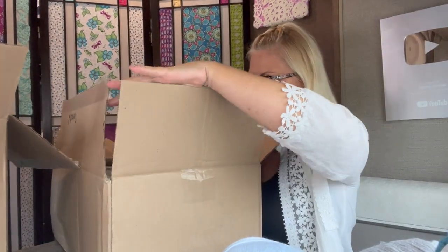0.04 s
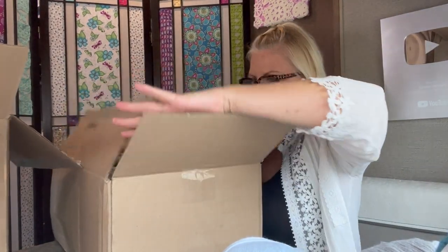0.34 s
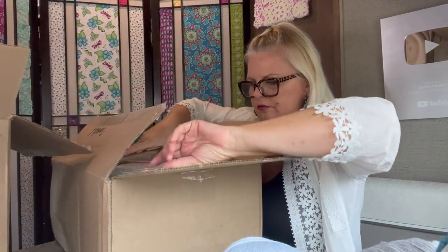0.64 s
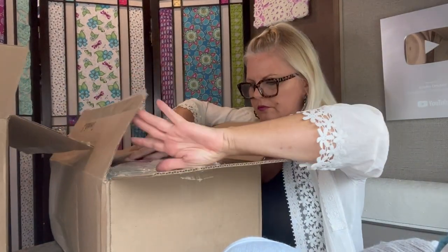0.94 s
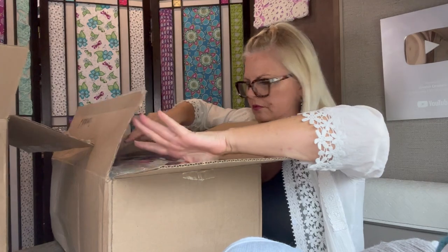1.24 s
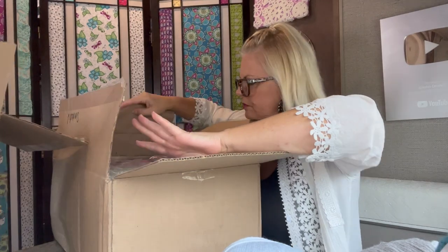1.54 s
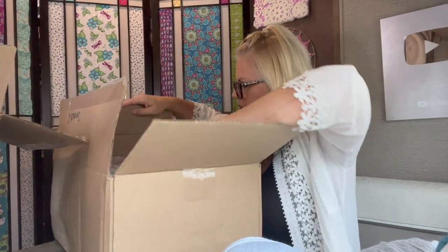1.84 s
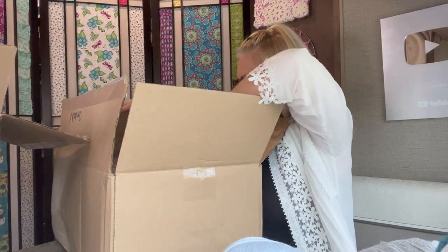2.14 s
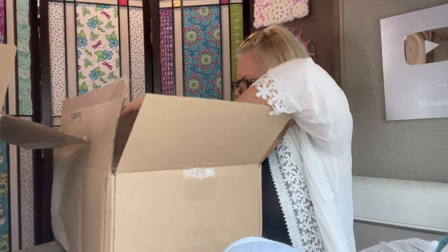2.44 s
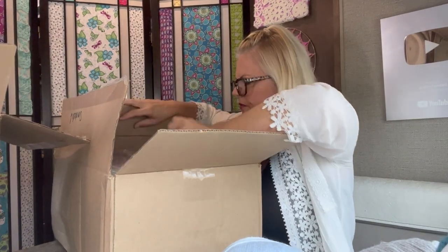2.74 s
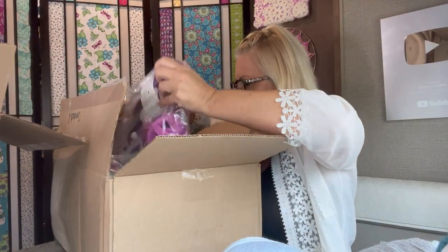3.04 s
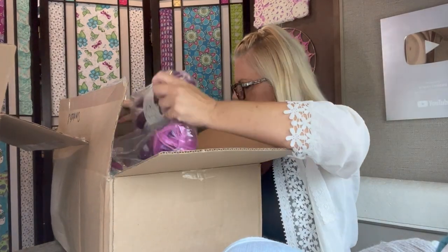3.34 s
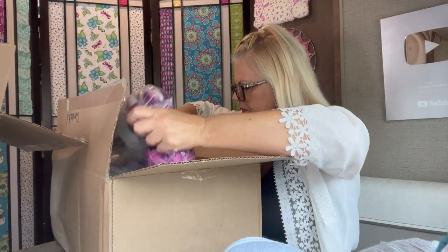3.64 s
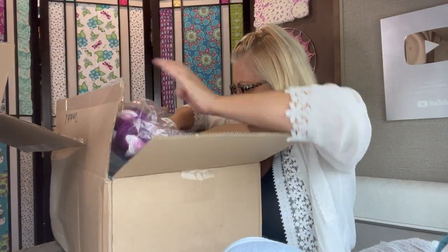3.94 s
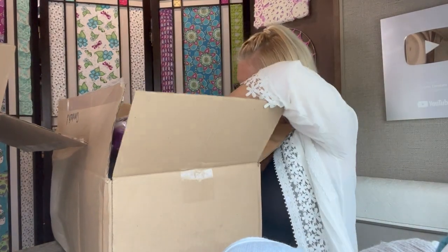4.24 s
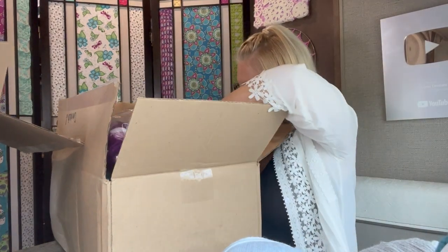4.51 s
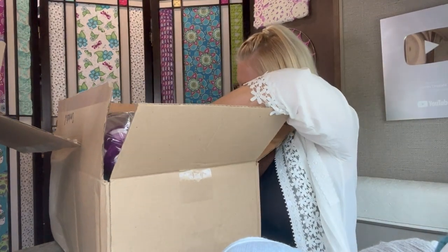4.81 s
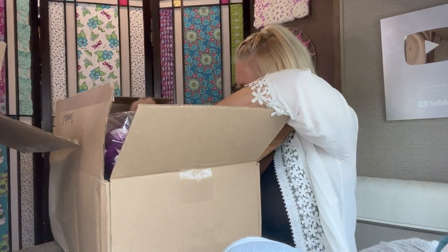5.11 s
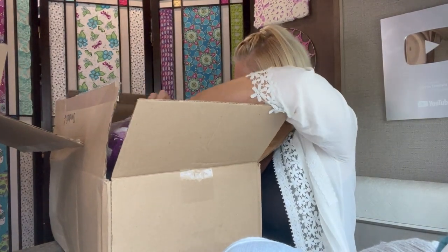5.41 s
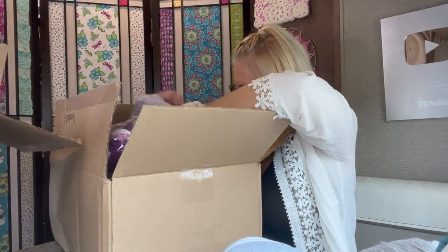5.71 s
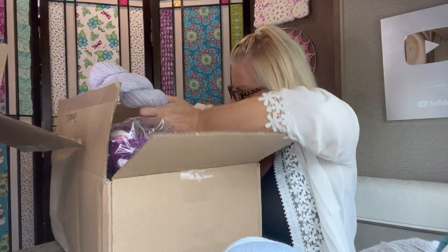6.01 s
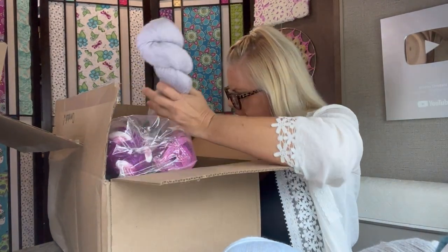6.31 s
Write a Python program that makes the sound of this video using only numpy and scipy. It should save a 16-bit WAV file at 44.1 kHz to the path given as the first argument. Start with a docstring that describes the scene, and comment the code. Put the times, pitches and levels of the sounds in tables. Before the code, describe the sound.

Cardboard box flaps scrape and knock open, then plastic bags of yarn slide, crinkle and snap over a faint fan-like drone.

```python
"""Digging yarn in plastic bags out of a big cardboard box; small room, close pair of microphone ports.
Over a fan-like drone, the flaps scrape and knock as they are pushed open. From about 1 s the bags
slide along the hollow box, which arms keep bumping. From 2 s the gripped film crinkles and snaps;
a faint whine swells at 3.3 s. Near 5.7 s the flaps scrape again, ending in light touches."""
import sys
import numpy as np
from scipy import signal
from scipy.fft import rfft, irfft, next_fast_len
from scipy.io import wavfile
from scipy.ndimage import uniform_filter1d

SR = 44100
rng = np.random.default_rng(int(sys.argv[2]) if len(sys.argv) > 2 else 0)


def dump(signal):
    """Clip the signal to [-1, 1] and save it as 16-bit WAV at the path in sys.argv[1]."""
    limited = np.clip(np.atleast_2d(signal).T, -1, 1)
    pcm = np.round(limited * 32767).astype(np.int16)
    wavfile.write(sys.argv[1], SR, pcm)


N = 280476
TIME = np.arange(N) / SR

# box modes: f/Hz, level/dB
BOX_MODES = [(125, -1), (148, 2), (168, 1), (232, 0), (275, -2), (325, -4), (390, 2), (435, -2), (510, -2),
             (580, -2), (665, -1), (748, -2), (808, -2), (899, -1), (965, -2), (1069, 0), (1179, 0),
             (1320, -2), (1500, -4), (1625, -4), (2050, -9)]
# spectrum of crumpling film: f/Hz, level/dB
FILM_COLOUR = [(300, -32), (1500, -19), (2800, -12.5), (4200, -7.5), (6200, .5), (7200, -1), (8000, -2),
               (10000, -1), (12000, -5.5), (13700, -5), (16000, -11)]


def gain_of(db):
    """Decibels to gain."""
    return 10 ** (np.asarray(db) / 20)


def unit_rms(x):
    """Scales to an rms of 1."""
    return x / np.sqrt(np.mean(x ** 2) + 1e-20)


def lookup(table, hz, column=1):
    """Table column, interpolated over log frequency."""
    columns = np.transpose(table)
    return np.interp(np.log(hz + 1), np.log(columns[0] + 1), columns[column])


def add(mix, start_s, sound):
    """Mixes in a two-channel sound."""
    part = mix[:, max(round(start_s * SR), 0):][:, :sound.shape[1]]
    part += sound[:, :part.shape[1]]


def gate(start_s, length_s, edge_s):
    """Unity gain for length_s, exponential skirts on both sides."""
    return np.exp(-np.maximum(abs(TIME - start_s - length_s / 2) - length_s / 2, 0) / edge_s)


def wander(per_s):
    """Random curve, rms 1, with per_s changes of course a second."""
    knots = rng.standard_normal(N // 64)
    return unit_rms(np.interp(TIME * per_s, np.arange(len(knots)), knots))


def grains(per_s, spread_db):
    """Random clicks of uneven size, rms 1, with their own strength in each channel."""
    hits = rng.random(N) < per_s / SR
    sizes = np.minimum(rng.exponential(1, N), 4)
    return unit_rms(hits * gain_of(spread_db * sizes) * rng.standard_normal((2, N)))


def coloured(x, colour, tilt_db_per_oct=0, size=1024):
    """Causal unit-energy filter with the given spectrum, tilted above 1 kHz."""
    hz = abs(np.fft.fftfreq(size, 1 / SR))
    log_gain = np.log(gain_of(lookup(colour, hz) + tilt_db_per_oct * np.log2(np.maximum(hz, 1000))))
    minimum_phase = np.exp(np.conj(signal.hilbert(log_gain)))
    taps = np.fft.ifft(minimum_phase).real[:size // 2]
    return signal.oaconvolve(x, taps[None] / np.linalg.norm(taps), axes=1)[:, :x.shape[1]]


def flexing(x, depth_db, hold_frames=14, width_bins=4):
    """Thin sheets ring at new pitches as they bend: brief resonances at unchanged frame energy."""
    spectra = signal.stft(x, nperseg=512, noverlap=384)[2]
    patches = rng.standard_normal(spectra.shape[1:])
    for axis, span in enumerate([width_bins, hold_frames]):
        patches = uniform_filter1d(patches, span, axis)
        patches = uniform_filter1d(patches, round(span / 2), axis)
    bent = spectra * gain_of(depth_db * np.clip(unit_rms(patches), -2, 2))
    bent *= np.linalg.norm(spectra, axis=(0, 1)) / (np.linalg.norm(bent, axis=(0, 1)) + 1e-20)
    return signal.istft(bent, nperseg=512, noverlap=384)[1][:, :N]


def hollow(x, width_hz=24, ring_db=-3):
    """The air in the box rings with whatever rubs its walls."""
    # air resonances: f/Hz, level/dB
    cavity = [(1384, 0), (1505, -6), (1627, -3), (1752, -3), (1923, 1), (2169, 1), (2297, -3), (2457, 0),
              (2559, -1), (2805, -4), (3910, -2)]
    return x + sum(gain_of(ring_db + db) * signal.lfilter(*signal.iirpeak(hz, hz / width_hz, fs=SR), x)
                   for hz, db in cavity)


def room(x, tail_db, wall_db, wall_s=.011, shift_per_s=.9, patterns=3, size=8192):
    """Direct sound, near-wall echoes, diffuse tail; the pattern shifts as hands and flaps move."""
    # room decay: f/Hz, t60/s
    decay = [(100, .2), (500, .18), (2000, .16), (6000, .14), (15000, .11)]
    t, shape = np.arange(size) / SR, (patterns, 2, size)
    taps = rng.standard_normal(shape) * (rng.random(shape) < .15)
    hz, frame_s, spectra = signal.stft(taps, SR, nperseg=128)
    fall = gain_of(-60 * frame_s / lookup(decay, hz)[:, None])
    tail = signal.istft(spectra * fall, SR, nperseg=128)[1][..., :size] * (t > .001)
    walls = rng.standard_normal(shape) * np.exp(-((t - wall_s) / .004) ** 2)
    echoes = (gain_of(tail_db) * unit_rms(tail) + gain_of(wall_db) * unit_rms(walls)) / np.sqrt(size)
    out = x
    for k in range(patterns):
        share = np.sqrt(2 / patterns) * np.cos(np.pi * (shift_per_s * TIME + k / patterns))
        out = out + signal.oaconvolve(x * share, echoes[k], axes=1)[:, :N]
    return out / np.sqrt(1 + gain_of(tail_db) ** 2 + gain_of(wall_db) ** 2)


def drone(level_db=-60.2):
    """Steady moving air: low rumble with narrow resonances."""
    # rumble spectrum: f/Hz, level/dB
    colour = [(20, 1), (45, -10), (60, -18), (100, -24), (120, 1), (170, 0), (200, -12), (235, -5),
              (290, -8), (400, -17), (550, -20), (1100, -22.5), (2500, -32), (6000, -40), (16000, -54)]
    # resonances: f/Hz, width/Hz, level/dB
    peaks = [(706, 20, -7.5), (748, 20, -6.5), (921, 36, -10.5), (1615, 35, -15)]
    hz = np.fft.rfftfreq(N, 1 / SR)
    power = gain_of(lookup(colour, hz)) ** 2
    for centre_hz, width_hz, db in peaks:
        power += gain_of(db) ** 2 / (1 + ((hz - centre_hz) / width_hz) ** 2) ** 2
    return gain_of(level_db) * unit_rms(irfft(rfft(rng.standard_normal((2, N))) * np.sqrt(power), N))


def whine(hz=1630, waver_hz=28, level_db=-67.5):
    """A thin, unsteady tone swells briefly in the drone."""
    tone = np.sin(2 * np.pi * np.cumsum(hz + waver_hz * wander(per_s=170)) / SR)
    return gain_of(level_db) * gate(start_s=3.268, length_s=.18, edge_s=.01) * tone


def sleeves(level_db=-74.3, swing_db=2, band_hz=(1400, 4200), width=.6):
    """Cloth whispers over the flaps throughout, with no clear direction."""
    band = signal.butter(2, band_hz, "bandpass", fs=SR, output="sos")
    cloth = signal.sosfilt(band, grains(per_s=6000, spread_db=2))
    return gain_of(level_db + swing_db * wander(per_s=16)) * unit_rms(cloth - width * cloth[::-1])


def jostling(corner_hz=190, t60_s=.11, swell_s=.005, lean_db=-62.5, swing_db=2.5, size=8192):
    """Leaning arms keep the box thudding faintly between firmer bumps; flesh softens each onset."""
    # bumps of arms and yarn: t/s, level/dB
    bumps = [(0.064, -52), (0.232, -52), (0.335, -47), (0.390, -44), (0.440, -49), (0.888, -39.5),
             (1.058, -47), (1.140, -52), (1.436, -50), (1.494, -43), (1.635, -48), (1.760, -49),
             (2.120, -49), (2.298, -46), (2.490, -52), (2.572, -50), (2.773, -48), (2.950, -43),
             (3.414, -49), (3.550, -53), (3.645, -51), (3.674, -45), (3.852, -50), (4.045, -52),
             (4.122, -41.5), (4.560, -51), (4.788, -51), (4.922, -49), (5.302, -53), (5.535, -49),
             (6.100, -53)]
    t = np.arange(size) / SR
    mode_hz, mode_db = np.transpose(BOX_MODES)
    weight = gain_of(mode_db) / (1 + (mode_hz / corner_hz) ** 4)
    envelope = np.exp(-np.log(1000) * t / t60_s) * (1 - np.exp(-t / swell_s)) ** 2
    modes = weight[:, None] * np.sin(2 * np.pi * mode_hz[:, None] * t) * envelope
    leaning = signal.oaconvolve(grains(per_s=250, spread_db=1), modes.sum(0)[None], axes=1)[:, :N]
    out = unit_rms(leaning) * gain_of(lean_db + swing_db * wander(per_s=14))
    for start_s, db in bumps:
        thud = (.5 + rng.random(len(BOX_MODES))) @ modes  # each spot favours other modes
        add(out, start_s, gain_of(db + 2.6) * np.array([thud, thud]) / abs(thud).max())
    return out


def brushing(pressure, catch_db=1.4):
    """Lightly rubbed cardboard rasps dryly, in uneven catches."""
    # rasp spectrum: f/Hz, level/dB
    colour = [(150, -20), (400, -9), (800, -7), (1400, -4.5), (2200, 1), (3300, -3), (5000, -11),
              (9000, -28), (16000, -50)]
    slips = grains(per_s=2200, spread_db=2.3) * unit_rms(gain_of(catch_db * wander(per_s=80)))
    rasp = flexing(coloured(slips * pressure, colour), depth_db=6, hold_frames=9, width_bins=3)
    return gain_of(1) * room(hollow(rasp), tail_db=-10, wall_db=-13)


def blow(centre_hz, t60_s, reach_oct=.5, crush_db=-4, rise_cycles=1.6, dent_cycles=3, size=8192):
    """A blow dents the card for a few cycles, then rings modes near centre_hz, with crushing noise."""
    def reach(f_hz):
        return 1 / (1 + (np.log2(f_hz / centre_hz) / reach_oct) ** 4)

    t, hz = np.arange(size) / SR, np.fft.rfftfreq(size, 1 / SR) + 1
    mode_hz, mode_db = np.transpose(BOX_MODES)
    mode_hz = mode_hz * (1 + .03 * rng.uniform(-1, 1, len(BOX_MODES)))  # hand pressure detunes
    phase = rng.random((2, len(BOX_MODES), 1))
    weight = gain_of(mode_db) * reach(mode_hz)
    ring = (weight[:, None] * np.sin(2 * np.pi * (mode_hz[:, None] * t + phase))).sum(1)
    crush = irfft(rfft(rng.standard_normal((2, size))) * reach(hz))
    rise = np.minimum(t * centre_hz / rise_cycles, 1)
    dent = gain_of(-1) * np.exp(-(t * centre_hz / dent_cycles) ** 2)
    envelope = gain_of(-2.5) * rise * (1 + dent) * np.exp(-np.log(1000) * t / t60_s)
    sound = (unit_rms(ring) + gain_of(crush_db) * unit_rms(crush)) * envelope
    return sound * np.linalg.norm(envelope) / np.linalg.norm(sound, axis=1, keepdims=True)


def knocks(wall_hz=390, wall_t60_s=.12, wall_lag_s=.003):
    """Each knock rings a flap and, through its fold, the wall behind it."""
    # stiff edges hitting flaps: t/s, flap level/dB, flap f/Hz, flap t60/s, wall level/dB
    hits = [(0.069, -53, 1200, .1, -51), (0.222, -41, 1200, .08, -45), (0.275, -47, 260, .15, -58),
            (0.304, -48, 620, .1, -51), (0.334, -45, 600, .13, -44), (0.371, -38.5, 560, .17, -45),
            (0.400, -39, 260, .17, -48), (0.432, -50, 560, .12, -52), (0.515, -53, 600, .1, -60),
            (0.877, -39, 1050, .09, -55), (0.886, -41, 950, .08, -52), (0.895, -38, 1100, .11, -52),
            (1.013, -47, 480, .1, -56), (1.075, -50, 450, .12, -58), (1.112, -48, 600, .1, -58),
            (1.143, -47, 600, .16, -56), (1.192, -33.5, 690, .1, -41), (1.355, -41, 1050, .1, -42),
            (1.452, -44, 1070, .08, -56), (1.485, -44, 560, .12, -48), (1.603, -49, 600, .06, -58),
            (2.117, -41, 740, .1, -41), (2.264, -38.5, 1150, .12, -56), (2.284, -31.5, 680, .1, -35),
            (2.297, -39, 760, .09, -46), (2.319, -39, 1050, .1, -52), (3.318, -55, 700, .1, -62),
            (3.495, -56, 1050, .12, -70), (3.852, -30.5, 385, .09, -54), (4.121, -50, 1050, .08, -64),
            (4.420, -52, 950, .1, -68), (4.678, -39, 740, .11, -47), (4.843, -45, 1200, .13, -54),
            (5.270, -52, 760, .1, -62), (5.690, -45, 1450, .1, -60), (5.727, -42, 1400, .1, -56),
            (6.048, -55, 740, .1, -64), (6.097, -41, 1030, .11, -53)]
    out = np.zeros((2, N))
    for start_s, flap_db, flap_hz, t60_s, wall_db in hits:
        add(out, start_s, gain_of(flap_db) * blow(flap_hz, t60_s))
        add(out, start_s + wall_lag_s, gain_of(wall_db) * blow(wall_hz, wall_t60_s))
    return gain_of(-1.6) * room(out, tail_db=-10, wall_db=-11)


def scrapes(release_s=.0055, catch_db=1.2):
    """A flap edge drags in small jerks; fibres catch and slip thousands of times a second."""
    # card on card: t/s, attack/s, length/s, level/dB, low cut/Hz, tilt/(dB/octave)
    strokes = [(0.0, .005, .05, -56, 2000, -3.5), (0.061, .004, .020, -33.5, 1100, -.3),
               (0.184, .005, .008, -43, 1600, -1.5), (0.219, .004, .016, -40, 1000, 11),
               (0.301, .004, .008, -43, 1900, -2), (0.329, .004, .028, -27.2, 1400, .4),
               (0.366, .004, .042, -29.8, 900, -1), (0.412, .004, .016, -43, 1400, -1),
               (0.462, .012, .022, -43, 2500, -2), (0.68, .015, .035, -58.5, 1800, -.5),
               (2.029, .004, .006, -36, 1000, 1.2), (2.040, .005, .020, -35.3, 1000, 1.6),
               (2.118, .004, .03, -54, 2200, 0), (2.161, .006, .02, -50.5, 2200, 1),
               (2.258, .012, .024, -45, 900, -8), (2.277, .006, .012, -43.5, 1000, -1),
               (2.567, .003, .010, -48, 1000, -3), (3.243, .006, .018, -60, 1000, -2),
               (3.599, .008, .016, -41, 1900, 0), (4.208, .002, .004, -35.5, 1900, -3),
               (4.332, .006, .015, -57, 1000, -2), (4.832, .012, .025, -56, 800, -8),
               (5.50, .04, .16, -64.5, 900, -3), (5.672, .010, .012, -40, 1700, 0),
               (5.681, .004, .057, -28.2, 1300, -1), (5.742, .006, .045, -40.5, 1400, -2),
               (5.79, .006, .032, -49, 1400, -3), (5.83, .02, .11, -63, 1400, -7),
               (5.893, .016, .026, -55.5, 1800, -9), (6.052, .014, .028, -55, 1900, -7),
               (6.128, .012, .022, -55, 2300, -14), (6.308, .018, .03, -57.5, 2400, -11)]
    # rasp spectrum: f/Hz, level/dB
    colour = [(200, -33), (700, -17), (1000, -6), (1300, -2), (1600, -2.5), (2200, -.5), (3000, -2.7),
              (4500, -5), (6400, -5.5), (8000, -10), (10000, -16), (11500, -24), (13500, -29), (16000, -44)]
    slips = grains(per_s=14000, spread_db=1.1) * gain_of(catch_db * wander(per_s=220))
    out = np.zeros((2, N))
    for start_s, attack_s, length_s, db, low_hz, tilt_db_per_oct in strokes:
        t = np.arange(int((length_s + .04) * SR)) / SR
        envelope = np.minimum(t / attack_s, 1) * np.exp(-np.maximum(t - length_s, 0) / release_s)
        rasp = coloured(slips[:, int(start_s * SR):][:, :len(t)], colour, tilt_db_per_oct)
        rasp = signal.sosfilt(signal.butter(3, low_hz, "highpass", fs=SR, output="sos"), rasp)
        add(out, start_s, gain_of(db) * unit_rms(rasp) * envelope[:rasp.shape[1]])
    flaps = flexing(out, depth_db=4, hold_frames=10)
    return gain_of(-3.4) * room(hollow(flaps), tail_db=-9, wall_db=-11)


def squeezing(rise_s=.004, sag_db_per_s=30, relax_db_per_s=480, settle_db=-84, swing_db=3):
    """Crumpling gain: the film gives at once, sags, relaxes when let go and stirs between grips."""
    # fingers closing on a bag: t/s, length/s, level/dB
    grips = [(0.44, .07, -63), (1.805, .07, -62), (1.9, .06, -68), (2.005, .09, -55), (2.16, .03, -62),
             (2.33, .06, -57), (2.568, .12, -57), (2.695, .025, -54), (2.735, .10, -63),
             (2.845, .17, -53.7), (3.023, .115, -55), (3.215, .04, -57.5), (3.293, .04, -59.5),
             (3.34, .13, -68), (3.485, .045, -65), (3.583, .035, -53.5), (3.64, .06, -64),
             (3.705, .06, -57.5), (3.775, .13, -49.5), (3.91, .10, -60.5), (3.968, .025, -54),
             (4.038, .008, -58), (4.18, .012, -68), (4.325, .025, -64), (4.39, .015, -58.5),
             (4.435, .045, -65), (4.487, .048, -60), (4.96, .09, -65), (5.128, .008, -66),
             (5.205, .05, -61), (5.265, .06, -58), (5.345, .12, -58), (5.52, .06, -69), (5.595, .06, -63.5),
             (6.175, .025, -65)]
    power = gain_of(settle_db + swing_db * wander(per_s=12)) ** 2
    for start_s, length_s, db in grips:
        t = np.maximum(TIME - start_s, 0)
        fall_db = sag_db_per_s * t + relax_db_per_s * np.clip(t - length_s, 0, 1)
        power += (np.minimum(t / rise_s, 1) * gain_of(db - fall_db)) ** 2
    return np.sqrt(power)


def pulling(ends_db=-10, arch=1.3, stop_s=.006):
    """Gains of film hiss, cardboard rub and taut-film sizzle; all follow the speed of each pull."""
    # bag pulls, and at 0.326 s the hiss of a scraping flap: t/s, speed-up/s, slow-down/s, level/dB, rub
    # share/dB, sizzle share/dB
    pulls = [(0.218, .012, .11, -51.5, -28, 2), (0.326, .008, .08, -45, -20, 1),
             (0.797, .058, .07, -48.5, -15, 0), (0.915, .083, .035, -49.5, -14, 2),
             (1.04, .16, .08, -58, 0, -11), (1.225, .14, .05, -47, -1, -11),
             (1.368, .020, .157, -33, -5.5, -5), (1.54, .08, .04, -44.5, -18, -6),
             (2.39, .07, .055, -47.8, -8, -1), (3.845, .035, .008, -39, -13, -8),
             (4.772, .02, .09, -47, -21, -14), (5.342, .03, .06, -53.5, -18, 1),
             (5.432, .012, .045, -53.5, -20, 1)]
    power = np.zeros((3, N))
    for start_s, rise_s, fall_s, db, rub_db, sizzle_db in pulls:
        off_peak = np.interp(TIME, [start_s, start_s + rise_s, start_s + rise_s + fall_s], [1, 0, 1])
        pull = gain_of(db + ends_db * off_peak ** arch) * gate(start_s, rise_s + fall_s, stop_s)
        power += np.outer(gain_of([0, rub_db, sizzle_db]), pull) ** 2
    return np.sqrt(power)


def sliding(pull, tautness, catch_db=.75, grit_db=-11):
    """A sliding bag hisses, its wrinkles catch as grit, and taut film sizzles."""
    # sliding film: f/Hz, level/dB
    hiss_colour = [(500, -35), (2000, -13), (4000, -9), (6400, 1.5), (8000, -1.5), (9700, -3), (11500, -14),
                   (13600, -17), (14600, -26), (16000, -35)]
    # taut film: f/Hz, level/dB
    sizzle_colour = [(2000, -45), (6000, -17), (8000, -5), (9700, 0), (11500, -7), (13600, -9),
                     (14600, -18), (16000, -28)]
    catching = unit_rms(gain_of(catch_db * wander(per_s=130)))
    friction = grains(per_s=14000, spread_db=1.2) + gain_of(grit_db) * grains(per_s=700, spread_db=1.5)
    hiss = coloured(friction * catching * pull, hiss_colour)
    sizzle = coloured(grains(per_s=6000, spread_db=1.5) * catching * tautness, sizzle_colour)
    film = flexing(gain_of(3.5) * (hiss + sizzle), depth_db=5, hold_frames=9, width_bins=3)
    return room(film, tail_db=-8, wall_db=-12)


def facets(each_per_s=60, band_hz=(5000, 14000), decay_cycles=4.5, count=24, size=512):
    """Small facets of film pop and ring for a few cycles, each at its own pitch."""
    t, out = np.arange(size) / SR, np.zeros((2, N))
    for hz in np.geomspace(*band_hz, count):
        ping = np.sin(2 * np.pi * hz * t) * np.exp(-t * hz / decay_cycles) * np.sqrt(hz)
        for when, rarity, left, right in rng.random((round(each_per_s * N / SR), 4)):
            strength = gain_of(-3 * np.log(rarity + .03))
            add(out, when * N / SR, strength * np.outer([left + .5, right + .5], ping))
    return unit_rms(out)


def crinkling(bend, clump_db=2.1):
    """Crumpled film: clumps of sharp crackles and ringing facets over a fine fizz."""
    crackles = gain_of(-3) * grains(per_s=520, spread_db=2.8)
    pings = gain_of(-6.5) * facets()
    fizz = gain_of(-4.5) * grains(per_s=5000, spread_db=2)
    clumps = unit_rms(gain_of(clump_db * np.clip(wander(per_s=170), -2, 1.5)))
    film = coloured((crackles + pings + fizz) * clumps * bend, FILM_COLOUR)
    return room(flexing(film, depth_db=6, hold_frames=9), tail_db=-9, wall_db=-12)


def snaps(rise_s=.0006, decay_s=.0021, boost_db=19.3, reach_oct=.6, size=512):
    """Single creases flip over in a millisecond or two, each with its own brightness."""
    # creases: t/s, level/dB, centre f/Hz
    creases = [(0.2273, -30, 9000), (0.526, -33, 9700), (0.5285, -34, 9700), (0.7975, -38, 5490),
               (2.0072, -43, 10100), (2.0325, -23, 5120), (2.3308, -47, 9970), (2.4111, -38, 10100),
               (2.6021, -46, 9980), (2.696, -46, 10000), (2.7054, -45, 11100), (2.8455, -42, 5270),
               (2.8742, -41, 6510), (2.8905, -42, 6200), (2.9104, -38, 8000), (2.915, -45, 3400),
               (2.9698, -42, 11300), (2.9935, -42, 4870), (3.023, -40, 9420), (3.030, -40, 6000),
               (3.042, -42, 5600), (3.055, -36, 6430), (3.078, -42, 6300), (3.1005, -33, 10600),
               (3.125, -40, 13000), (3.150, -48, 5200), (3.2157, -47, 10400), (3.3035, -39, 9180),
               (3.309, -40, 10400), (3.4263, -40, 5040), (3.5834, -39, 8000), (3.6967, -47, 4810),
               (3.7136, -45, 5000), (3.7261, -44, 6430), (3.7762, -39, 9880), (3.8036, -30, 8500),
               (3.8418, -33, 6420), (3.8505, -30, 6100), (3.876, -27, 6070), (3.8805, -25, 6200),
               (3.9408, -38, 6800), (3.9697, -34, 5400), (3.9784, -34, 4790), (4.0399, -45, 9620),
               (4.3912, -44, 3990), (4.4654, -46, 7030), (4.4873, -39, 6310), (4.5077, -42, 6400),
               (4.5299, -35, 5950), (4.7857, -39, 5850), (5.018, -45, 10100), (5.131, -50, 6000),
               (5.2695, -38, 6620), (5.3274, -44, 5490), (5.342, -36, 10400), (5.374, -41, 10000),
               (5.391, -40, 9500), (5.4362, -35, 10100), (5.452, -35, 10500), (5.5998, -49, 11200),
               (5.802, -40, 11500), (5.932, -51, 11500), (6.293, -54, 11500)]
    t, hz = np.arange(size) / SR, np.fft.rfftfreq(size, 1 / SR) + 1
    envelope = np.minimum(t / rise_s, 1) * np.exp(-t / decay_s)
    out = np.zeros((2, N))
    for start_s, db, centre_hz in creases:
        band = 1 / (1 + (np.log2(hz / centre_hz) / reach_oct) ** 2)
        fizz = irfft(rfft(rng.standard_normal((2, size))) * band)
        crack = coloured(fizz * envelope, FILM_COLOUR)
        add(out, start_s, gain_of(db + boost_db) * crack / np.linalg.norm(crack))
    return room(flexing(out, depth_db=4.5, width_bins=9), tail_db=-9, wall_db=-11)


def scene(grip_rub_db=-15, pull_crinkle_db=-13):
    """Box, bags and background; grips also rub the cardboard, pulls also crumple the film."""
    squeeze = squeezing()
    pull, rub, tautness = pulling()
    bend = np.hypot(squeeze, gain_of(pull_crinkle_db) * pull)
    box = scrapes() + knocks() + jostling() + brushing(rub + gain_of(grip_rub_db) * squeeze)
    bags = snaps() + crinkling(bend) + sliding(pull, tautness)
    return box + bags + sleeves() + drone() + whine()


def record(dry, low_cut_hz=80, high_cut_hz=15900):
    """Bass and top treble come out alike in both channels but shifted in phase; then low cut and band limit."""
    # microphone pair: f/Hz, coherence/(0-1), left phase lead/rad, left minus right/dB
    ports = [(80, .95, 0, 1.5), (150, .9, .1, -3.3), (260, .78, .5, -6), (430, .6, 2.2, -4),
             (760, .55, 5.3, 4.5), (1400, .2, 7.3, .5), (2400, .14, 7.1, .5), (4000, .14, 7.2, -2.5),
             (6000, .3, 8.3, -5), (7400, .7, 9.3, -1.5), (9000, .85, 10, 0), (10600, .9, 12.1, 0),
             (12700, .9, 13, 0), (13800, .85, 15, 0), (15000, .95, 15.7, 0)]
    size = next_fast_len(N + 4096)
    hz = np.fft.rfftfreq(size, 1 / SR)
    coherence, lead_rad, balance_db = (lookup(ports, hz, column) for column in (1, 2, 3))
    left, other = rfft(dry, size)
    right = (coherence * left + np.sqrt(1 - coherence ** 2) * other) * np.exp(-1j * lead_rad)
    spectra = np.array([left * gain_of(balance_db / 2), right * gain_of(-balance_db / 2)])
    pair = irfft(spectra, size)[:, :N]
    low_cut = signal.butter(2, low_cut_hz, "highpass", fs=SR, output="sos")
    high_cut = signal.firwin(511, high_cut_hz, window=("kaiser", 9), fs=SR)
    return signal.oaconvolve(signal.sosfilt(low_cut, pair), high_cut[None], "same")


dry = scene()
out = record(dry)
dump(out)
```